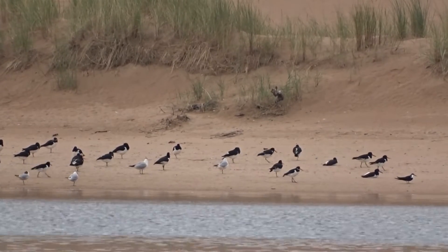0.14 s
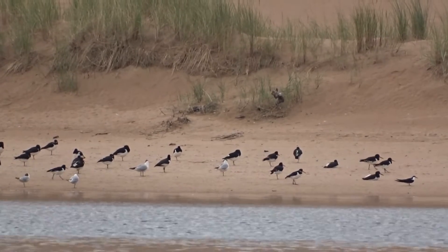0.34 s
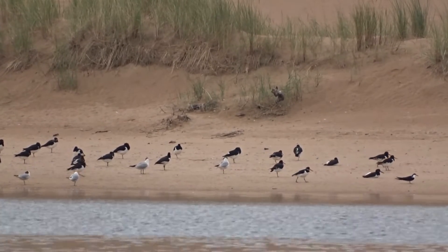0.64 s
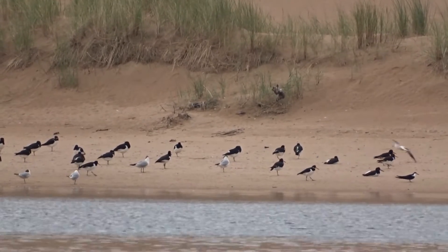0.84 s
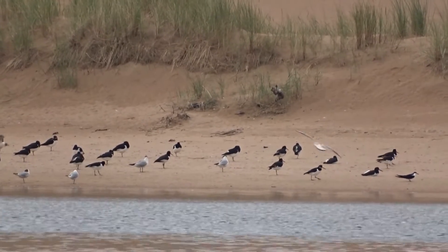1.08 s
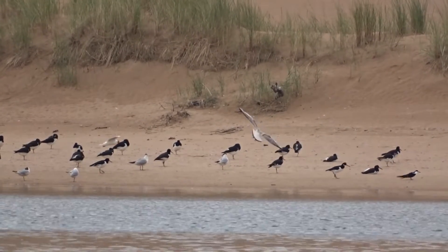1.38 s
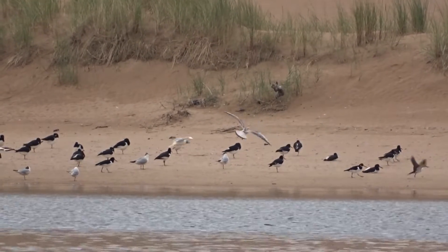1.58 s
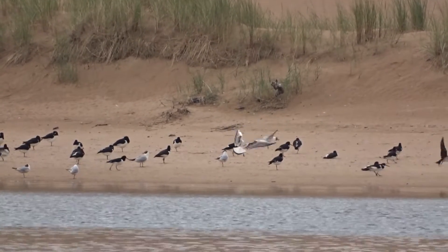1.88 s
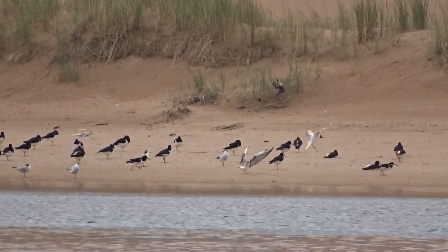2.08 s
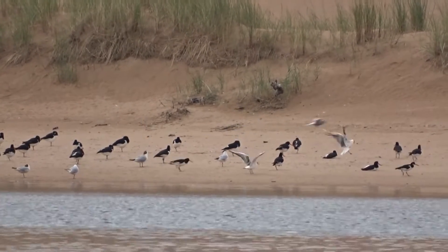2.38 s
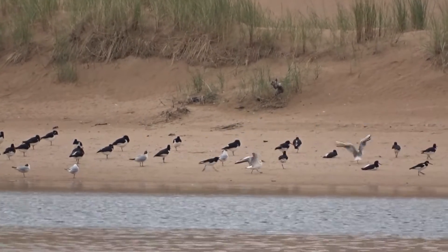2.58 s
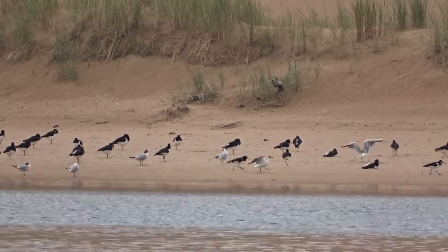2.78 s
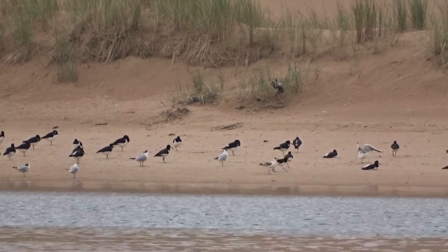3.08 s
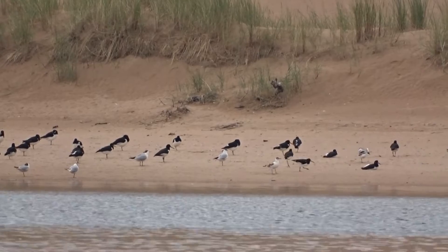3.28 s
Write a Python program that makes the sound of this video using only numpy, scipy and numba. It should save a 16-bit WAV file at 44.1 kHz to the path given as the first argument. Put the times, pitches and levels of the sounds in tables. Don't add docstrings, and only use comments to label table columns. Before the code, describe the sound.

A dense shorebird flock trills and pipes throughout, echoing lightly off sand and water. Clear rising whistles, some cracking downward, come at 0, 0.9, 1.8, 2.7 and 3.3 seconds. Low wind rumbles and thumps the microphone, strongest at the start, around 0.75 and 2.6. A close camera rattles near 0.75, 1.35, 2.1 and 2.6; another answers farther off at 3.15. Faint water hiss, brighter late.

```python
import sys
import numpy as np
from scipy import signal
from scipy.io import wavfile
from scipy.ndimage import uniform_filter1d
from numba import njit

SR = 44100
rng = np.random.default_rng(int(sys.argv[2]) if len(sys.argv) > 2 else 0)


def materialize(psi):
    bounded = np.clip(np.atleast_2d(psi).T, -1, 1)
    quanta = np.round(bounded * 32767).astype(np.int16)
    wavfile.write(sys.argv[1], SR, quanta)


def natural_amplitude(level_db):
    exponent = np.asarray(level_db, float) / 20
    return 10 ** exponent


N = 151263

# (start [s], top [s], end [s], level [dB], octave level [dB])
WHISTLE_EVENTS = [
    (-.05, 0.022, .05, -29, -40),
    (0.903, 0.957, .99, -34, -52),
    (1.804, 1.858, 1.895, -32.5, -55),
    (2.692, 2.766, 2.805, -41, -37.5),
    (3.258, 3.288, 3.305, -37, -60),
]
# (start [s], length [s], pitch [Hz], level [dB])
BREAK_EVENTS = [
    (0.047, 0.029, 1442, -42.5),
    (1.893, 0.026, 1486, -48.5),
    (2.806, 0.0213, 1420, -44.5),
    (3.409, 0.045, 1470, -41),
]
BREAK_PARTIALS_DB = [-2.5, 9, 4, 0.5]
# (start [s], length [s], first pitch [Hz], last pitch [Hz], level [dB])
PIPE_EVENTS = [(.39, .095, 2200, 2080, -45), (.55, .15, 2600, 2650, -46), (.8, .035, 2050, 2330, -44),
               (.832, .035, 2330, 2050, -44), (.16, .06, 4300, 4250, -52), (.515, .04, 5250, 5100, -57),
               (1.22, .09, 2400, 2200, -47), (1.31, .05, 2330, 2300, -46), (1.43, .065, 2750, 2300, -45),
               (1.86, .05, 2050, 2400, -44), (2.14, .06, 2400, 2250, -43), (2.22, .095, 2250, 2280, -45),
               (2.5, .08, 2200, 2350, -46), (1.0, .12, 1700, 1560, -52), (3.06, .14, 1720, 1520, -52),
               (1.035, .025, 5150, 5050, -58), (1.06, .03, 5100, 4900, -57), (1.24, .035, 5150, 4950, -57),
               (3.14, .085, 2150, 2230, -40), (2.155, .037, 5300, 4900, -52), (2.115, .04, 4950, 5350, -57),
               (.575, .04, 5150, 4800, -54), (1.735, .045, 2450, 2450, -46), (2.69, .058, 2380, 2620, -41),
               (3.305, .032, 5300, 5100, -55), (2.0, .06, 3450, 3150, -43), (2.42, .06, 2600, 2600, -44),
               (2.855, .09, 2350, 2200, -46), (2.715, .03, 7300, 7800, -59), (.515, .04, 4600, 4300, -55),
               (3.225, .04, 2250, 2500, -45), (2.83, .04, 5500, 4900, -58), (1.9, .035, 6100, 6300, -61)]
# (start [s], length [s], pitch [Hz], trill rate [1/s], level [dB])
TRILL_EVENTS = [(.34, .15, 3280, 110, -37), (.74, .12, 3100, 90, -40), (.86, .05, 2450, 65, -37),
                (1.62, .13, 3200, 80, -39), (1.782, .032, 2480, 70, -36), (1.95, .06, 3400, 100, -41),
                (2.1, .24, 3250, 95, -38), (2.03, .11, 2350, 55, -40), (2.55, .07, 3100, 90, -41),
                (2.61, .07, 2400, 60, -41), (2.74, .11, 2150, 75, -41), (3.0, .145, 2200, 62, -39),
                (1.28, .12, 3100, 90, -45), (.775, .03, 2150, 70, -41), (.76, .04, 2850, 75, -39),
                (1.08, .22, 3600, 120, -46), (.94, .08, 1520, 70, -50), (1.66, .08, 2300, 70, -42),
                (1.66, .07, 4900, 65, -47), (1.68, .075, 5850, 55, -53), (2.555, .07, 4800, 85, -49),
                (2.565, .055, 6100, 85, -53), (3.38, .03, 4700, 90, -49), (3.385, .025, 6300, 90, -52),
                (3.09, .1, 3150, 80, -40), (2.8, .09, 3500, 110, -44), (1.65, .07, 6600, 70, -60),
                (.3, .25, 6600, 110, -62), (.42, .09, 5000, 70, -55), (3.0, .04, 5600, 90, -56)]
# (start [s], length [s], level [dB], drop [Hz])
SQUEAK_EVENTS = [
    (1.938, .047, -52, 1700),
    (2.328, .044, -53, 1700),
    (2.247, .018, -55, 0),
    (2.279, .016, -56, 0),
    (1.535, .02, -59, 0),
]
# (pitch [Hz], pitch spread [share], level [dB])
CHORUS_GROUPS = [(2335, 0.061, -45), (2850, .07, -40), (3278, 0.057, -39), (1591, 0.076, -53.5),
                 (4083, 0.1, -47), (5130, .08, -58)]
# (time [s], level [dB])
GUST_LEVELS = [(0, -22.5), (.3, -30.5), (.55, -32.5), (.72, -21.5), (.98, -29.5), (1.18, -25), (1.32, -31),
               (1.65, -33.5), (1.8, -28.5), (2.1, -29.5), (2.4, -30), (2.95, -37), (3.3, -33),
               (3.43, -26.5)]
# (frequency [Hz], density [dB per Hz])
WIND_SPECTRUM = [(12, -33), (20, -2), (59, 2.5), (108, -1), (177, -12.5), (375, -21.5), (900, -58),
                 (1170, -62), (1980, -120)]
# (time [s], level [dB])
THUMP_EVENTS = [(.01, 9), (0.128, 8), (.26, 3.5), (.6, -2), (0.765, 9.5), (0.901, 5.5), (1.378, 4),
                (1.695, 3.5), (2.16, 3.5), (2.324, 9.5), (2.441, 5), (2.632, 18), (2.78, 10.5),
                (2.85, 10.5), (3.357, 12.5)]
# (frequency [Hz], density [dB per Hz])
WATER_SPECTRUM = [(350, -13), (800, -18.5), (1200, -25), (3000, -14), (6000, -39.5), (8200, -45),
                  (12500, -38), (15700, -38)]
# (time [s], level [dB])
FRAME_EVENTS = [
    (0.761, -31),
    (0.832, -29.5),
    (1.3397, -31.5),
    (1.4107, -35),
    (2.0534, -32),
    (2.1248, -29.5),
    (2.1958, -28),
    (2.582, -29),
    (2.652, -29),
]
# (delay [s], level [dB], ring [s])
FRAME_CLICKS = [
    (0, 3.5, 0.0023),
    (0.0154, -0.5, 0.0041),
    (0.043, -3, 0.0049),
    (0.047, -20, 0.0036),
    (0.0567, -13, 0.0037),
    (0.061, -7, 0.0044),
]
# (time [s], level [dB])
SINGLE_CLICKS = [(0.7088, -35), (0.727, -36), (0.915, -44), (1.1732, -49), (1.29, -33), (1.3, -41),
                 (1.452, -50), (1.308, -42), (2.0197, -37), (2.338, -47), (2.381, -42), (2.4259, -39.5),
                 (.175, -47), (.655, -56), (2.5307, -33), (2.547, -35), (2.711, -37), (2.8005, -45),
                 (2.9457, -45.5)]
# (time [s], level [dB])
FAR_CAMERA_CLICKS = [(3.1423, -39), (3.1787, -37), (3.1931, -36), (3.2181, -36), (3.315, -46)]
# (start [s], level [dB], fade [s])
FAR_CAMERA_WHIRR = (3.12, -46, .14)
# (frequency [Hz], width [Hz], level [dB])
BODY_MODES = [(4800, 1600, 7), (7250, 940, 7), (9870, 6000, 3), (11730, 1100, -0.5), (14300, 1800, -17)]

LOW_HZ, TOP_HZ, RISE_S, SAG_HZ, SAG_S = 2382, 2758, .055, 142, .0407
PIPES_DB, PIPE_OCTAVE_DB, PIPE_ARCH_HZ = 4.5, -24, 90
SQUEAK_HZ, SQUEAK_HOLD_SHARE = 7050, .5
ARCH_SHARE, ROUGH_SHARE, TRILL_OCTAVE_DB, BEAT_SHARP = .06, .016, -25, .8
CRY_S, TRILL_HZ = .08, 95
BIRD_PAN_DB, BANK_T60_S, BANK_DB = -7, .35, -14
PORT_LAG_S, WIND_APART, WIND_PAN_DB = .0011, .34, -.5
THUMP_S, TILT_DB_PER_OCTAVE, POP_DB = .022, .6, 20.5
WIND_DB, WATER_DB, HISS_RISE_DB = -24.5, -40, 5.5
MOTOR_DB, MOTOR_FADE_S, CLICK_S, CAMERA_PAN_DB = -19.5, .07, .0045, -4.5


@njit
def svf(x, hz, width):
    y, b, l = np.empty(len(x)), 0., 0.
    g, k = np.tan(np.pi * hz / SR), width / hz
    for i in range(len(x)):
        v = (b + g * (x[i] - l)) / (1 + g * (g + k))
        b, l, y[i] = 2 * v - b, l + 2 * g * v, k * v
    return y


def noise_band(x, hz, width_hz):
    return svf(svf(x, hz, width_hz), hz, width_hz)


def level(x, db):
    return x * natural_amplitude(db) / np.sqrt(np.mean(x ** 2))


def walk(rate, n=N):
    hold = max(int(SR / rate), 1)
    steps = np.repeat(rng.standard_normal(n // hold + 1), hold)
    return 1.367 * uniform_filter1d(uniform_filter1d(steps, hold), hold)[:n]


def colour(table, hz):
    table_hz, table_db = np.array(table).T
    return np.interp(np.log(hz), np.log(table_hz), table_db)


def pan(db):
    return natural_amplitude(np.array([[db / 2], [-db / 2]]))


def add(out, start, x):
    i = int(start * SR)
    a, b = max(i, 0), min(i + x.shape[-1], N)
    if b > a:
        out[..., a:b] += x[..., a - i:b - i]


def note(length, hz, partials, edge=.067, rough=.0059):
    u = np.linspace(0, 1, int(length * SR))
    pitch = hz(u) * (1 + rough * walk(500, len(u)))
    phase = 2 * np.pi * np.cumsum(pitch) / SR + 7 * rng.random()
    tone = sum(g * np.sin((k + 1) * phase) for k, g in enumerate(partials))
    ends = np.clip(np.minimum(u, 1 - u) / edge, 0, 1) ** .67
    return np.sqrt(2) * tone * ends, u


def trill(length, hz, rate, db, depth=.93):
    tone, u = note(length, lambda u: hz * (1 + ARCH_SHARE * (np.sin(np.pi * u) - .6 - .4 * u)),
                   [1, natural_amplitude(TRILL_OCTAVE_DB)], edge=.069, rough=ROUGH_SHARE * depth)
    beat = np.cumsum(rate * (1 + .326 * walk(60, len(u)))) / SR + rng.random()
    chop = 1 - depth * np.abs(np.cos(np.pi * beat)) ** BEAT_SHARP
    return natural_amplitude(db) * tone * chop * (1 + 1.3 * depth)


def chorus(count=100):
    out = 0
    for hz, spread, db in CHORUS_GROUPS:
        group = np.zeros((2, N))
        for k, c in enumerate(rng.standard_normal((count, 6))):
            pitch = hz * (1 + spread * np.clip(c[1], -2, 2))
            rate = TRILL_HZ * (pitch / 3200) ** 1.6
            depth = np.clip(1 + .35 * c[2], .35, 1)
            cry = trill(CRY_S * np.exp(.3 * c[0]), pitch, rate, 2 * c[3], depth)
            start = (k + .3 * c[4]) * (N / SR + .19) / count - .2
            add(group, start, cry * pan(BIRD_PAN_DB + 2.9 * c[5]))
        out = out + level(group, db)
    return out


def whistles():
    out = np.zeros(N)
    for s, top, end, db, octave_db in WHISTLE_EVENTS:
        from_top = np.linspace(s - top, end - top, int((end - s) * SR))
        up = np.cos(np.pi / 2 * np.clip(-from_top / RISE_S, 0, 1)) ** 2
        sag = np.sin(np.pi / 2 * np.clip(from_top / SAG_S, 0, 1)) ** 2
        bend = LOW_HZ + (TOP_HZ - LOW_HZ) * up - SAG_HZ * sag
        partials = [natural_amplitude(db + .93 * (3 - up)), natural_amplitude(octave_db - 5.5 * (1 - up))]
        add(out, s, note(end - s, lambda u: bend, partials, edge=.046)[0])
    return out


def bank(x):
    t = np.arange(int(.5 * SR)) / SR
    tail = rng.standard_normal((2, len(t))) * np.exp(-np.log(1000) * t / BANK_T60_S) * (t > .004)
    tail = tail / np.sqrt(np.sum(tail ** 2, axis=1, keepdims=True))
    return x + natural_amplitude(BANK_DB) * signal.fftconvolve(x, tail, axes=1)[:, :N]


def wind():
    t = np.arange(N) / SR
    gust = np.interp(t, *np.array(GUST_LEVELS).T)
    effort = sum(db * np.exp(-((t - s) / THUMP_S) ** 2) for s, db in THUMP_EVENTS)
    slap = np.zeros(N)
    slap_at = [int((s - .004) * SR) for s, db in THUMP_EVENTS]
    slap[slap_at] = natural_amplitude(POP_DB) * rng.choice([-1, 1], len(THUMP_EVENTS))
    out = 0
    for hz in 22 * 2 ** np.arange(0, 5.1, .5):
        octave = np.log2(hz / 60)
        shared = noise_band(rng.standard_normal(N) + slap, hz, hz / 2)
        apart = WIND_APART * noise_band(rng.standard_normal(N), hz, hz / 2)
        reach = np.clip(.066 + TILT_DB_PER_OCTAVE * octave, 0, 1.3)
        db = colour(WIND_SPECTRUM, hz) + gust + effort * reach + 1.98 * walk(29.75)
        late = np.roll(shared, int(PORT_LAG_S * SR))
        ports = np.array([shared + apart, late - apart])
        out = out + natural_amplitude(db) * ports * pan(WIND_PAN_DB + 1.6 * octave)
    return level(out, WIND_DB)


def water():
    swell = np.clip(np.arange(N) / SR - 1.7, 0, 1)
    out = 0
    for hz in 385 * 2 ** np.arange(0, 5.4, 1 / 3):
        mid, side = (noise_band(rng.standard_normal(N), hz, hz / 3) for _ in range(2))
        rise = HISS_RISE_DB * np.clip(hz / 3000 - 1, 0, 1) * swell
        db = colour(WATER_SPECTRUM, hz) + .64 * walk(5.62) + rise
        out = out + natural_amplitude(db) * (mid + .5 * side * np.array([[1], [-1]]))
    return level(out, WATER_DB) * pan(-2.1)


def voice_breaks():
    out = np.zeros(N)
    for s, d, hz, db in BREAK_EVENTS:
        tone, u = note(d, lambda u: hz * (1 + .0286 * np.sin(np.pi * u) - .0566 * u),
                       natural_amplitude(db + np.array(BREAK_PARTIALS_DB)), edge=.11, rough=.0027)
        add(out, s, tone * (1 - .5 * np.sin(2 * np.pi * u) ** 8))
    return out


def pipes():
    out = np.zeros(N)
    for s, d, first, last, db in PIPE_EVENTS:
        tone, _ = note(d, lambda u: first + (last - first) * u + PIPE_ARCH_HZ * np.sin(np.pi * u) ** 2,
                       [natural_amplitude(db), natural_amplitude(db + PIPE_OCTAVE_DB)])
        add(out, s, tone * natural_amplitude(PIPES_DB))
    return out


def rattle(ring, rise=.0026):
    t = np.arange(int(.3 * SR)) / SR
    return np.exp(-t / ring) * np.minimum(t / rise, 1)


def camera():
    near, far = np.zeros(N), np.zeros(N)
    for (s, db), after in zip(FRAME_EVENTS, FRAME_EVENTS[1:] + FRAME_EVENTS[:1]):
        burst_goes_on = 0 < after[0] - s < .1
        for late, rel_db, ring in FRAME_CLICKS if burst_goes_on else FRAME_CLICKS[:2]:
            add(near, s + late, natural_amplitude(db + rel_db) * rattle(ring))
        add(near, s, natural_amplitude(db + MOTOR_DB) * rattle(MOTOR_FADE_S, .015))
    for s, db in SINGLE_CLICKS:
        add(near, s, natural_amplitude(db) * rattle(CLICK_S))
    for s, db in FAR_CAMERA_CLICKS:
        add(far, s, natural_amplitude(db) * rattle(CLICK_S))
    whirr_s, whirr_db, fade = FAR_CAMERA_WHIRR
    add(far, whirr_s, natural_amplitude(whirr_db) * rattle(fade, .0035))
    grit = rng.standard_normal(N) * natural_amplitude(walk(900)) + .4 * rng.standard_normal((2, N))
    struck = (near * pan(CAMERA_PAN_DB) + far) * grit
    return np.array([sum(natural_amplitude(db) * svf(x, 1. * hz, 1. * w) for hz, w, db in BODY_MODES) for x in struck])


def trills():
    out = np.zeros(N)
    for s, d, hz, rate, db in TRILL_EVENTS:
        add(out, s, trill(d, hz, rate, db))
    return out


def squeaks():
    out = np.zeros(N)
    for s, d, db, drop_hz in SQUEAK_EVENTS:
        def pitch(u):
            fall = np.clip(u - SQUEAK_HOLD_SHARE, 0, 1) / (1 - SQUEAK_HOLD_SHARE)
            return SQUEAK_HZ - drop_hz * fall ** 1.4
        add(out, s, note(d, pitch, [natural_amplitude(db)], rough=.002)[0])
    return out


def scene():
    near_birds = whistles() + voice_breaks() + pipes() + trills() + squeaks()
    birds = chorus() + near_birds * pan(BIRD_PAN_DB)
    return bank(birds) + wind() + water() + camera()


def top_cut(x):
    return signal.sosfilt(signal.butter(12, 15750, fs=SR, output="sos"), x)


def record(dry):
    low_pass = signal.ellip(8, .2, 60, 15700, fs=SR, output="sos")
    mix = signal.sosfilt(low_pass, dry)
    return top_cut(mix)


dry = scene()
out = record(dry)
materialize(out)
```